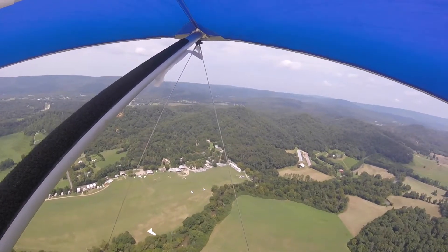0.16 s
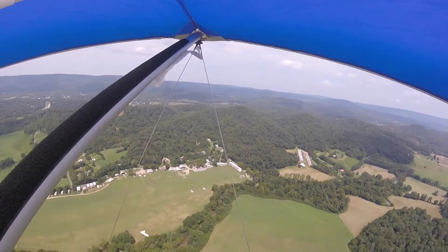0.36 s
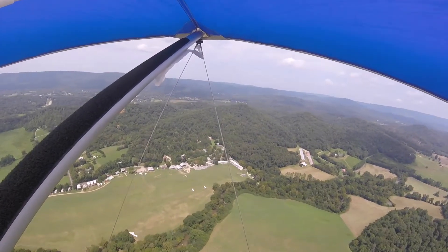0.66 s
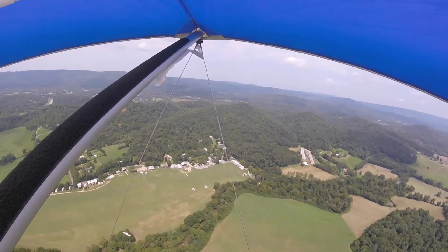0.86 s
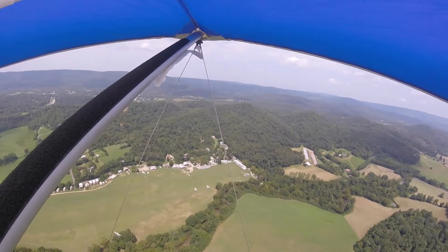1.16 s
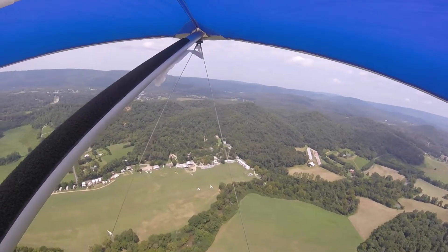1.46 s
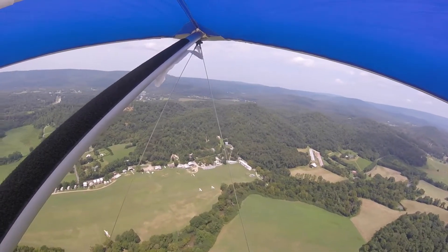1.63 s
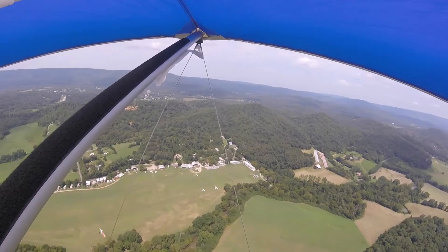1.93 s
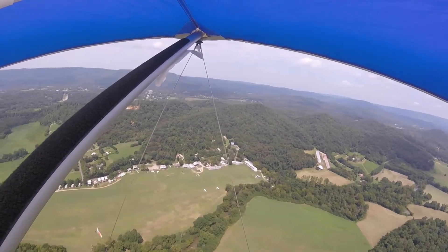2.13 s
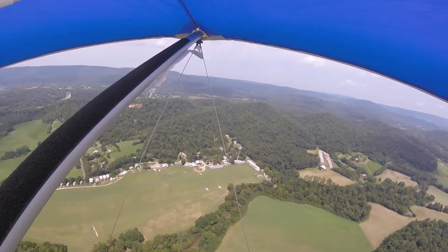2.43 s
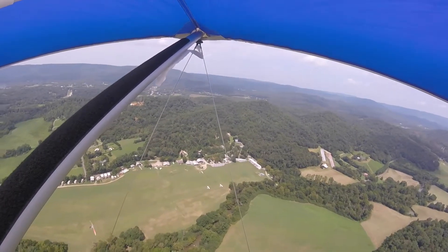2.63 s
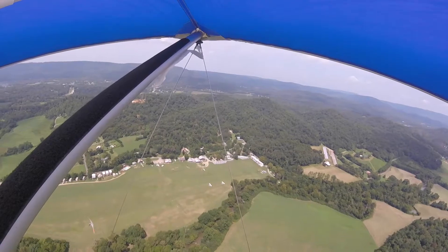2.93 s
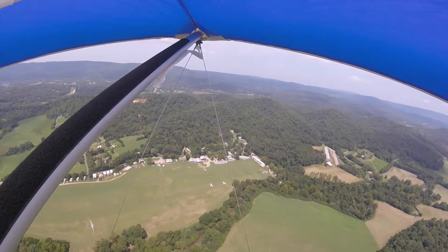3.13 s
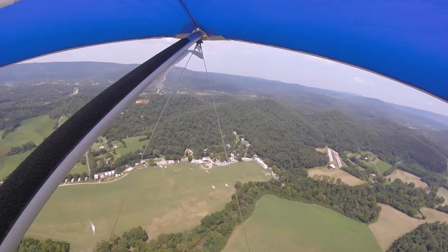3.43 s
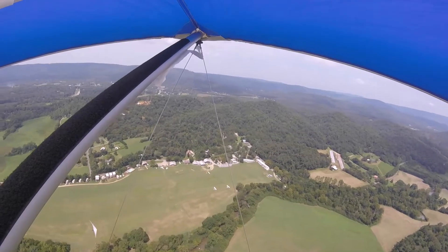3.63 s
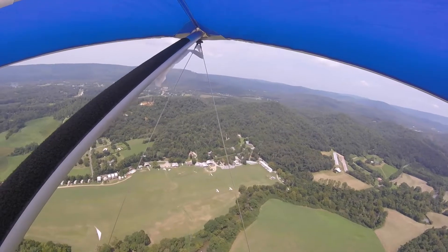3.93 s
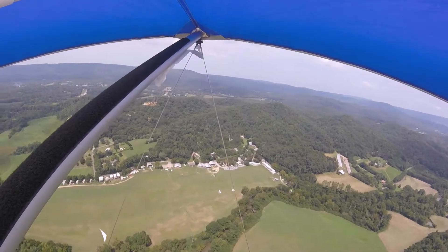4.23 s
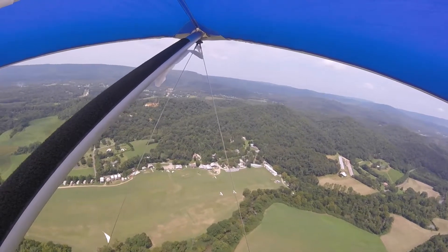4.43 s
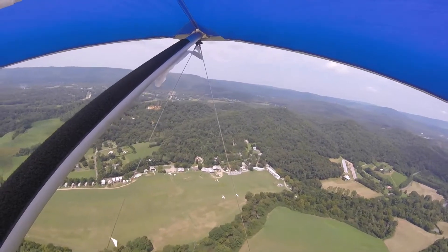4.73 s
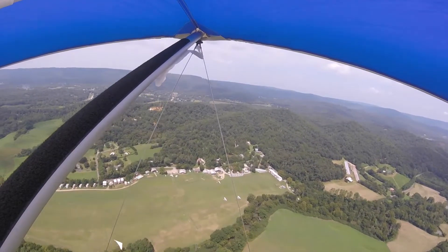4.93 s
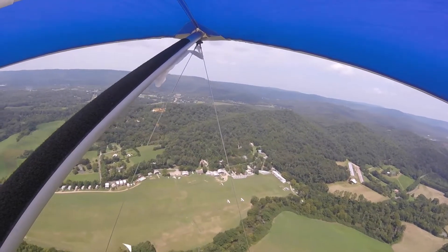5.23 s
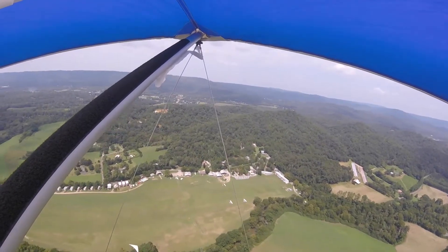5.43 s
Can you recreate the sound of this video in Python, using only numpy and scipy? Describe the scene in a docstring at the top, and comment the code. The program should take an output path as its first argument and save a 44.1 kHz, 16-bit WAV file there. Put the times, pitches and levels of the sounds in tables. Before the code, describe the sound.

Deep, uneven wind buffeting thumps a microphone on a soaring hang glider, while its mount rattles rapidly in bouts over faint hiss.

```python
"""Deep, uneven buffeting of air on a microphone fixed to a hang glider high above open country.
Turbulence gives a noise rumble, patchy finer noise and single pressure pulses, one for each large eddy.
Airflow shakes the rig: its mount knocks about 21 times a second, in bouts, and rings the frame's damped modes.
The frame also hums as a wavering sine; the slipstream is a dull rush and a resonant hiss of coloured noise,
and the rigging adds a few faint ticks of decaying noise."""
import sys
import numpy as np
from scipy import signal
from scipy.fft import rfft, irfft, next_fast_len
from scipy.io import wavfile
from scipy.ndimage import uniform_filter1d

SR = 44100
rng = np.random.default_rng(int(sys.argv[2]) if len(sys.argv) > 2 else 0)


def file_out(sig):
    """Save sig as 16-bit WAV at sys.argv[1]."""
    # one column per channel
    cols = np.atleast_2d(sig).T
    # limit, then scale
    lim = np.clip(cols, -1, 1)
    pcm = np.round(lim * 32767).astype(np.int16)
    wavfile.write(sys.argv[1], SR, pcm)


N = 245637
TIME = np.arange(N) / SR  # seconds

# Strength of the slipstream, before the layer gains: start_s [s], relative_level_db [dB]
AIRSPEED = [(0, -61.5), (1.15, -60.5), (1.4, -63), (2.5, -61), (4.75, -59), (5.5, -60.5)]
# Turbulence at the microphone, before the layer gains:
# start_s [s], large_eddies_db [dB], small_eddies_db [dB]
TURBULENCE = [(0, -28, -36.5), (0.149, -29, -37.5), (0.6, -24, -42.5), (0.819, -26.5, -35.5),
              (1.3, -24.5, -35.5), (1.621, -31.5, -34), (1.72, -34, -54), (2.15, -33.5, -47.5),
              (2.6, -33, -51), (3.12, -32, -50), (3.36, -28.5, -41.5), (3.7, -33, -53),
              (3.88, -26.5, -44.5), (4.25, -34.5, -46.5), (4.701, -30.5, -48), (5.15, -29.5, -43.5),
              (5.34, -39.5, -49.5), (5.5, -26.5, -42)]
# Single large eddies striking the microphone: centre_s [s], peak_pressure_db [dB], half_width_ms [ms]
EDDY_STRIKES = [(0.069, -15.5, 5.7), (0.153, -18, 1.9), (0.296, -18.5, 2.2), (0.447, -19, 1.66),
                (0.605, -21, 2.16), (0.713, -19.5, 1.44), (0.791, -14, 3.6), (0.806, -17.5, 1.9),
                (0.837, -11.5, 2.1), (0.846, -14.5, 1.9), (1.118, -19.5, 1.95), (1.15, -14, 1.87),
                (1.224, -28, 1.5), (1.248, -19, 2.15), (1.273, -13.5, 3), (1.324, -15.5, 1.33),
                (1.353, -13, 3.6), (1.444, -20.5, 2.1), (1.628, -20, 3.1), (2.796, -19, 1.87),
                (3.229, -18.5, 4.8), (3.385, -19, 2.9), (3.45, -13.5, 2.7), (3.571, -23, 1.5),
                (4.134, -19.5, 3.3), (4.333, -20.5, 4.6), (4.899, -13.5, 2.45), (5.043, -22.5, 2.4),
                (5.142, -14, 1.66), (5.1615, -11.5, 3.24), (5.556, -7.5, 2.9)]
# Knocks of the mount, before the layer gains: start_s [s], relative_strength_db [dB]
KNOCKS = [(0.0521, -41.5), (0.101, -38.5), (0.149, -36.5), (0.2002, -39), (0.248, -36.5), (0.294, -37),
          (0.3405, -35.5), (0.3873, -40), (0.4377, -43.5), (0.4866, -41.5), (0.623, -46), (0.667, -37.5),
          (0.7134, -37), (0.771, -38.5), (0.819, -37.5), (0.867, -35.5), (0.916, -34.5), (0.962, -36),
          (1.0138, -42), (1.0592, -44), (1.101, -47.5), (1.153, -49.5), (1.298, -39), (1.356, -35),
          (1.41, -41.5), (1.459, -45.5), (1.5152, -39.5), (1.5637, -41.5), (1.6201, -39), (1.67, -43.5),
          (1.7174, -43), (1.8894, -39), (1.9357, -37), (1.9848, -38), (2.0282, -42), (2.1671, -44),
          (2.227, -41), (2.2815, -37), (2.3328, -41.5), (2.386, -37.5), (2.428, -36), (2.4744, -43),
          (2.532, -40.5), (2.5769, -44), (2.779, -40.5), (3.0583, -43), (3.0996, -39), (3.21, -51.5),
          (3.2565, -37.5), (3.3072, -38), (3.353, -36), (3.3988, -35.5), (3.4449, -37), (3.563, -39),
          (3.606, -39.5), (3.653, -43.5), (3.754, -43), (3.8012, -38.5), (3.848, -36.5), (3.895, -33.5),
          (3.941, -32.5), (3.988, -33.5), (4.0283, -44), (4.072, -34.5), (4.116, -34.5), (4.1619, -39),
          (4.234, -40), (4.28, -39), (4.3332, -37.5), (4.38, -35), (4.427, -37), (4.474, -34.5),
          (4.52, -37.5), (4.5676, -37.5), (4.614, -45.5), (4.6652, -38), (4.71, -39.5), (4.7584, -33.5),
          (4.8042, -34), (4.8499, -34), (4.8954, -39.5), (5.0427, -40), (5.0948, -42.5), (5.1408, -35.5),
          (5.1856, -35.5), (5.2306, -36.5), (5.2761, -33.5), (5.3233, -34.5), (5.3661, -35), (5.4087, -45),
          (5.5142, -36), (5.5633, -35)]
# Dry ticks of the rigging, before colouring: start_s [s], level_db [dB], decay_ms [ms]
TICKS = [(1.298, -37.5, 0.38), (3.736, -50, 11), (4.42, -44.5, 1.5)]

# Heavily damped modes of mount and housing: pitch_hz [Hz], bandwidth_hz [Hz], gain_db [dB]
FRAME_MODES = [(306, 55.3, 10), (437, 66, -7), (516, 43, -9), (600, 22, -13.5), (733, 34, -4.5),
               (843, 90, -2), (1048, 40, -4), (1224, 69, -9.5)]
# Slow swings of the frame, before wavering: pitch_hz [Hz], bandwidth_hz [Hz], gain_db [dB]
SWAY_MODES = [(42.3, 7, 14), (109.6, 6.35, 25), (126.3, 4, 13), (149, 14, 3), (253.5, 9.5, 15.5)]

# Relative spectrum of the slipstream's dull rush: frequency_hz [Hz], density_db [dB per Hz]
RUSH_SPECTRUM = [(100, -22.5), (250, 2), (520, -1.5), (800, -7), (1150, -14.5), (1500, -22.5),
                 (2500, -39.5)]
# Relative spectrum of the hiss before its resonance: frequency_hz [Hz], density_db [dB per Hz]
HISS_SPECTRUM = [(500, 0), (1400, 2), (2500, 1), (3200, 1.5), (3850, 3.5), (5000, -4), (6000, -4.5),
                 (7200, -6.5), (8800, -11), (10200, -21), (11700, -17.5), (13300, -20.5), (14500, -34.5)]
# Relative spectrum of the rigging ticks: frequency_hz [Hz], density_db [dB per Hz]
TICK_SPECTRUM = [(500, 5), (2500, -2), (5500, -7), (9000, -14.5), (13000, -30)]
# Relative spectrum of the loose joint's force: frequency_hz [Hz], density_db [dB per Hz]
CHATTER_SPECTRUM = [(100, -24), (300, -7.5), (600, 7), (950, 2), (1400, -7.5), (2200, -35.5)]
# Relative spectrum of the dry crack of a knock: frequency_hz [Hz], density_db [dB per Hz]
CRACK_SPECTRUM = [(700, -15), (1350, -1.5), (2000, 0.5), (2400, -11.5), (4000, -28)]
# Relative spectrum of the large eddies: frequency_hz [Hz], density_db [dB per Hz]
RUMBLE_SPECTRUM = [(8, -14.5), (20, 2), (42, -3), (62, -4.5), (85, -9), (130, -12.5), (200, -46.5)]
# Relative spectrum of the small eddies: frequency_hz [Hz], density_db [dB per Hz]
EDDY_SPECTRUM = [(40, -17.5), (85, -1.5), (130, 0), (185, -3.5), (260, -14.5), (360, -22.5), (600, -40)]
# Relative spectrum of the finest eddies: frequency_hz [Hz], density_db [dB per Hz]
FINE_EDDY_SPECTRUM = [(120, -28.5), (210, 1), (290, -1), (380, -12), (600, -31.5)]


def undb(db):
    """Level is logarithmic: 20 dB is a factor of ten in amplitude."""
    return 10 ** (np.asarray(db) / 20)


def unit(x):
    """Normalise to a root-mean-square amplitude of 1."""
    return x / np.sqrt(np.mean(x ** 2))


def curves(table):
    """Linear interpolation turns each table column after the first into a value per sample."""
    start_s, *columns = np.transpose(table)
    return [np.interp(TIME, start_s, column) for column in columns]


def colour(x, spectrum):
    """Spectral shaping: filter x, with a steep fall above the last point; white noise keeps its level."""
    hz, db = np.transpose(spectrum)
    f = np.maximum(np.fft.rfftfreq(N, 1 / SR), 1)
    gain = undb(np.interp(np.log(f), np.log(hz), db))
    gain = gain * np.minimum(hz[-1] / f, 1) ** 2
    return irfft(rfft(x) * unit(gain), N)


def noise(spectrum):
    """Random pressure: white noise filtered to a given colour, with rms 1."""
    return unit(colour(rng.standard_normal(N), spectrum))


def ring(x, modes):
    """Modal superposition: a force drives damped resonators, whose velocities add."""
    size = next_fast_len(N + SR)  # room for the decay
    f = np.maximum(np.fft.rfftfreq(size, 1 / SR), 1)
    response = 0
    for hz, width_hz, db in modes:
        detuning = (f * f - hz * hz) / (f * width_hz)
        response = response + undb(db) / (1 + 1j * detuning)
    return irfft(rfft(x, size) * response, size)[:N]


def walk(rate):
    """Random modulation: smoothed chance of rms 1, changing about rate times a second."""
    k = max(int(SR / rate), 2)
    held = rng.standard_normal(N)[np.arange(N) // k]
    return unit(uniform_filter1d(uniform_filter1d(held, k), k))


def add(track, start_s, sound):
    """Linear superposition: mix a short sound into a track."""
    i = int(np.clip(start_s * SR, 0, N - 1))
    track[i:i + len(sound)] += sound[:N - i]


def push(t, length_s, roundness=1.67):
    """Elastic contact: the force rises and falls as a half sine raised to a power."""
    return np.abs(np.sin(np.pi * np.clip(t / length_s, 0, 1))) ** roundness


def slipstream(rush_db=-49.0, hiss_db=1.0, rush_flicker_db=1.62, hiss_flicker_db=0.5):
    """Flow noise: air over sail and wires gives a dull rush, and a hiss that rings the microphone opening."""
    speed_db, = curves(AIRSPEED)
    rush_level_db = rush_db + speed_db - speed_db.mean() + rush_flicker_db * walk(31)
    rush = noise(RUSH_SPECTRUM) * undb(rush_level_db)
    hiss = noise(HISS_SPECTRUM)
    opening = [(6476, 290, 7)]  # air resonance: Hz, bandwidth in Hz, gain in dB
    hiss = unit(hiss + ring(hiss, opening))
    return rush + hiss * undb(speed_db + hiss_db + hiss_flicker_db * walk(40))


def rigging():
    """Impulsive noise: each tick is a burst of coloured noise that dies away exponentially."""
    envelope = np.zeros(N)
    t_ms = np.arange(SR // 10) * 1000 / SR
    for start_s, level_db, decay_ms in TICKS:
        add(envelope, start_s, undb(level_db) * np.exp(-t_ms / decay_ms))
    return colour(envelope * rng.standard_normal(N), TICK_SPECTRUM)


def frame_hum(hum_db=-46.5, wander=0.0395, waver_db=3.0):
    """Flow-induced vibration: airflow sustains the strongest frame swing as a sine of wandering pitch."""
    hz = max(SWAY_MODES, key=lambda mode: mode[2])[0]
    speed_db, = curves(AIRSPEED)
    phase = 2 * np.pi * np.cumsum(hz * (1 + wander * walk(14))) / SR
    level_db = hum_db + speed_db - speed_db.mean() + waver_db * walk(8)
    return unit(np.sin(phase)) * undb(level_db)


def mount(
    knock_db=12.5, contact_s=0.0013, crack_db=-1.5, crack_s=0.00044,
    hardening=0.01, gust_hardening=0.0063,  # log shortening of contact per dB
    rebound_s=0.00207, rebound_contact_s=0.0007, rebound_db=-6.0,
    swing_s=0.01435, swing_contact_s=0.0021, swing_db=-12,
    chatter_db=-24, chatter_s=0.014, chatter_width_s=0.0061,
    scrape_db=-37, scrape_s=0.055, waver_s=0.00026, waver_db=1.0,
):
    """Impact excitation: a push, crack, rebound and chattering back swing; contact forces ring the modes."""
    force, back, loose, crack = np.zeros((4, N))
    t = np.arange(SR // 10) / SR
    usual_db = np.mean([db for _, db in KNOCKS])
    gust_s, _, gust_db = np.transpose(TURBULENCE)
    gust_db = gust_db - gust_db.mean()
    for (start_s, db), chance in zip(KNOCKS, rng.standard_normal((len(KNOCKS), 4))):
        # strong knocks, and those in rough air, tend to have shorter, brighter contacts
        hardness = hardening * (db - usual_db) + gust_hardening * np.interp(start_s, gust_s, gust_db)
        stretch = np.exp(0.04 * chance[0] - hardness)
        rebound_t = t - rebound_s * (1 + 0.05 * chance[2])
        rebound = undb(rebound_db + 0.6 * chance[1]) * push(rebound_t, rebound_contact_s * stretch)
        add(force, start_s, -undb(db) * (push(t, contact_s * stretch) + rebound))
        add(crack, start_s + crack_s, [undb(db + crack_db) / stretch])
        # the loose joint bumps and chatters on the back swing, and scrapes as it settles
        late = 1 + 0.05 * chance[3]
        add(back, start_s, -undb(db + swing_db) * push(t - swing_s * late, swing_contact_s))
        chatter = undb(chatter_db) * np.exp(-((t - chatter_s * late) / chatter_width_s) ** 2)
        scrape = undb(scrape_db) * np.exp(-t / scrape_s)
        add(loose, start_s, undb(db) * (chatter + scrape))
    # the swings waver in timing and level as the load changes
    sway = np.interp(TIME + waver_s * walk(9), TIME, ring(force, SWAY_MODES))
    sway = sway * undb(waver_db * walk(15))
    frame = ring(force + back + loose * noise(CHATTER_SPECTRUM), FRAME_MODES)
    return undb(knock_db) * (sway + frame) + colour(crack, CRACK_SPECTRUM)


def buffeting(rumble_db=1.5, eddies_db=5, patchy_db=2.0, fine_db=-11, fine_patchy_db=5,
              wake_db=-25, wake_s=0.011):
    """Turbulent pressure: large eddies rumble; small ones come in patches and round each single strike."""
    large_db, small_db = curves(TURBULENCE)
    large = noise(RUMBLE_SPECTRUM) * undb(large_db + rumble_db)
    small, wake = undb(small_db + eddies_db), np.zeros(N)
    t = np.arange(-SR // 20, SR // 20) / SR
    for centre_s, db, half_width_ms in EDDY_STRIKES:
        u = (t * 1000 / half_width_ms) ** 2
        # suction in the core, with a swing of pressure before and after it
        add(large, centre_s + t[0], -undb(db) * (1 - u) * np.exp(-u / 2))
        add(wake, centre_s + t[0], undb(db + wake_db) * np.exp(-(t / wake_s) ** 2))
    patch = 2 * np.tanh(walk(70) / 2)  # bounded to +-2
    patchy = unit(noise(EDDY_SPECTRUM) * undb(patchy_db * patch))
    # the finest eddies are concentrated more sharply in the strong patches
    fine = undb(fine_db) * unit(noise(FINE_EDDY_SPECTRUM) * undb(fine_patchy_db * patch))
    return large + patchy * (small + wake) + fine * small


def scene():
    """Free field: all sources add at one microphone, and open air returns no echo."""
    return (slipstream() + rigging() + frame_hum() + mount() + buffeting())[None]


def record(dry):
    """Band limiting: the camera weakens the deepest pressure swings and cuts the top; the start fades in."""
    x = signal.sosfilt(signal.butter(2, 14, "highpass", fs=SR, output="sos"), dry)
    x = x * np.minimum(TIME / 0.004, 1)  # 4 ms fade-in
    top_hz = 13900
    return signal.sosfilt(signal.ellip(8, 0.2, 70, top_hz, fs=SR, output="sos"), x)


dry = scene()
out = record(dry)
file_out(out)
```